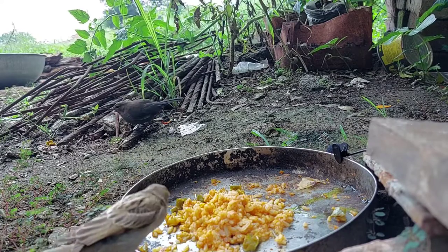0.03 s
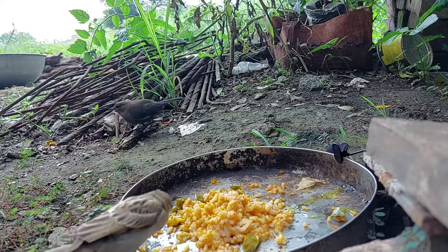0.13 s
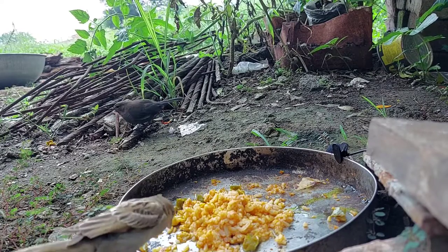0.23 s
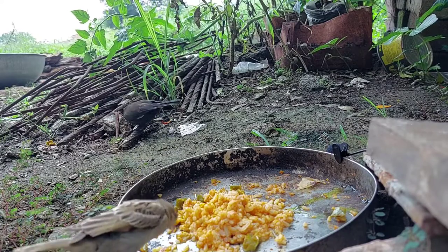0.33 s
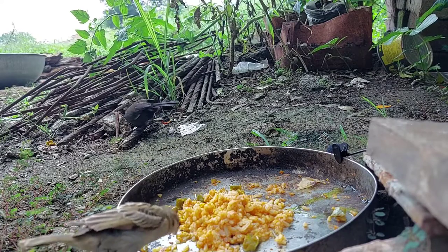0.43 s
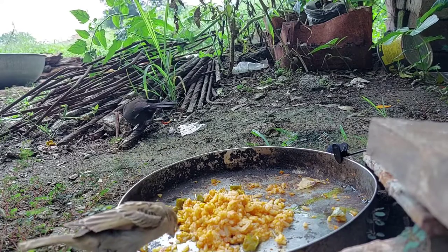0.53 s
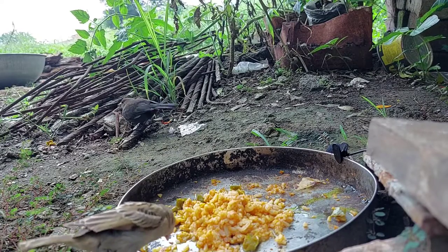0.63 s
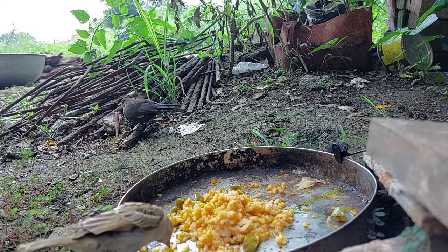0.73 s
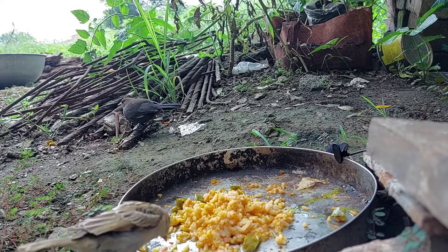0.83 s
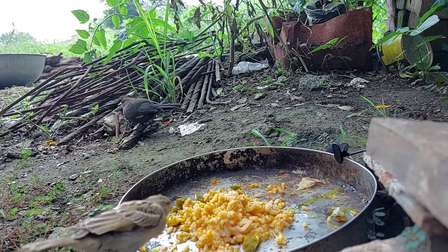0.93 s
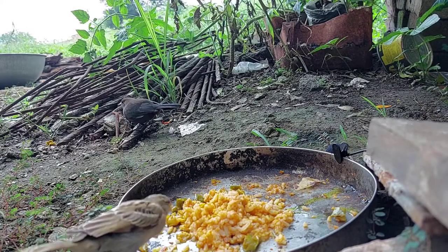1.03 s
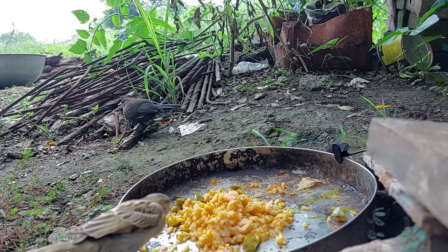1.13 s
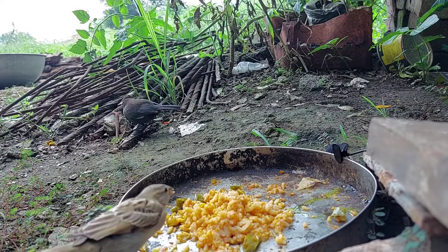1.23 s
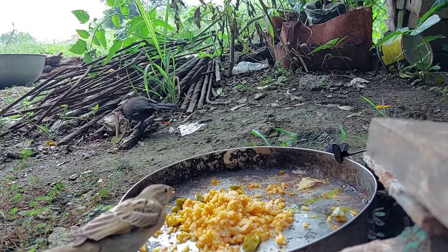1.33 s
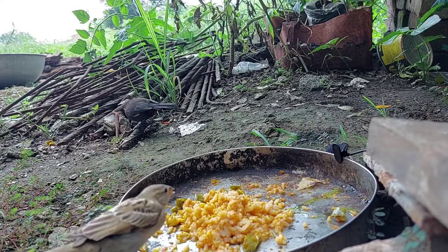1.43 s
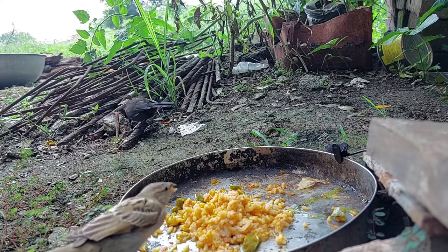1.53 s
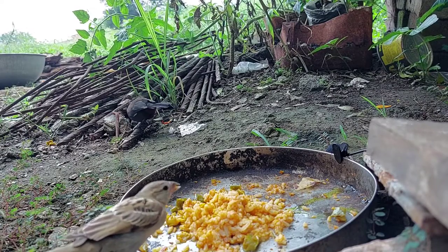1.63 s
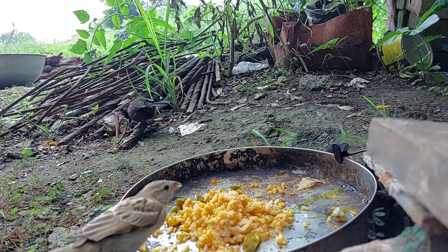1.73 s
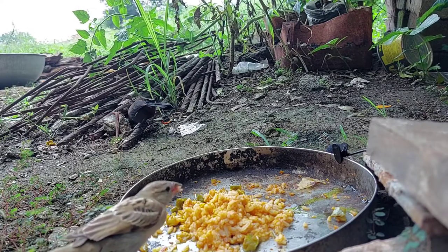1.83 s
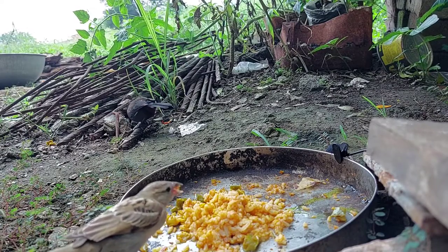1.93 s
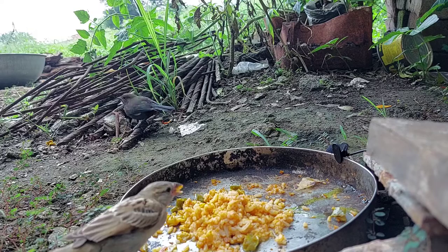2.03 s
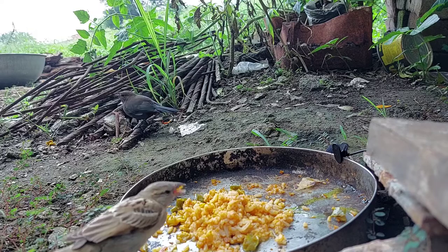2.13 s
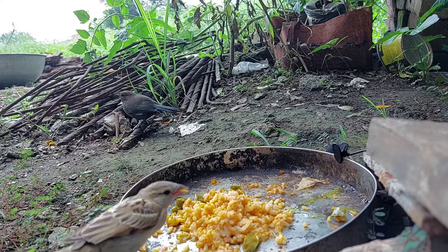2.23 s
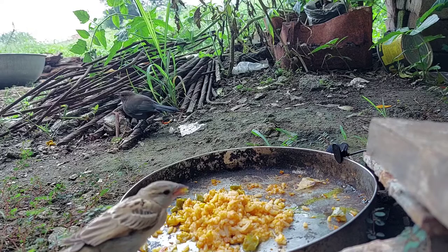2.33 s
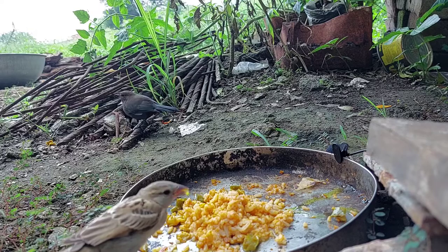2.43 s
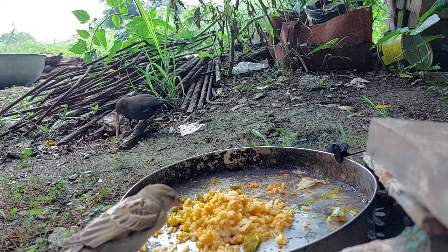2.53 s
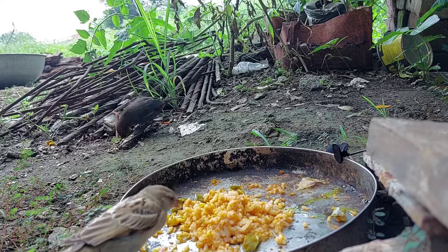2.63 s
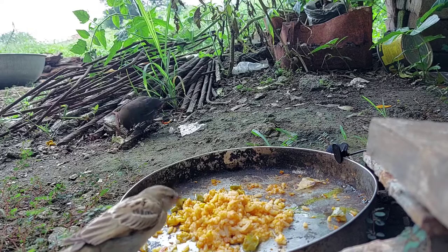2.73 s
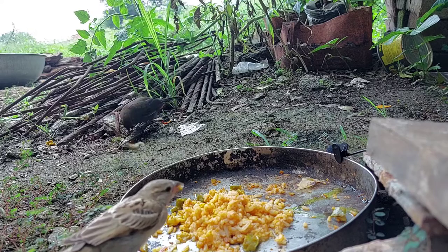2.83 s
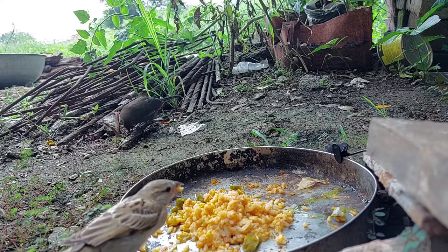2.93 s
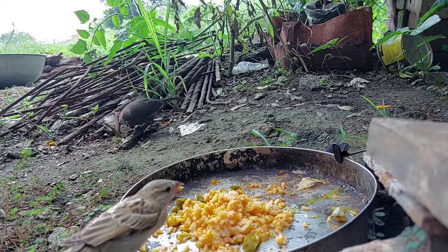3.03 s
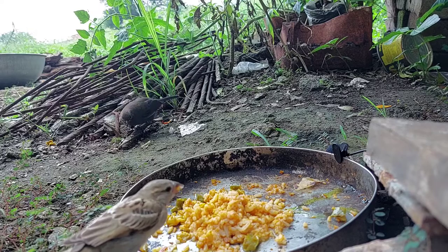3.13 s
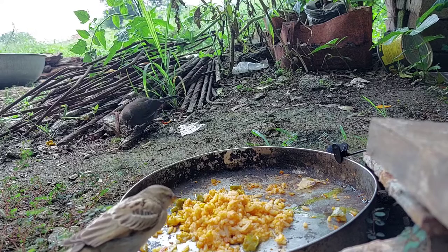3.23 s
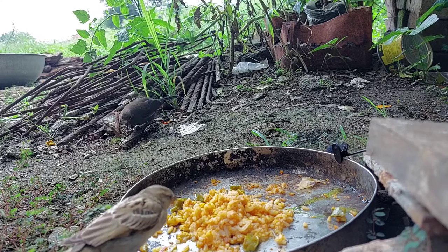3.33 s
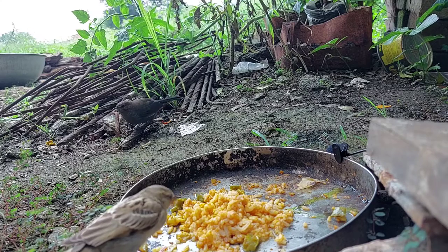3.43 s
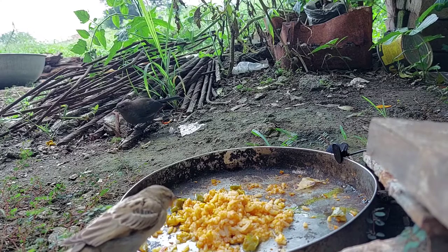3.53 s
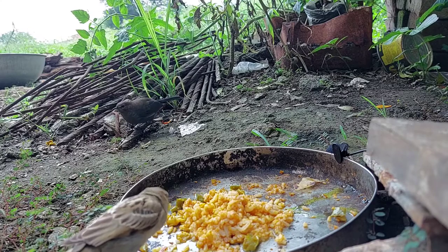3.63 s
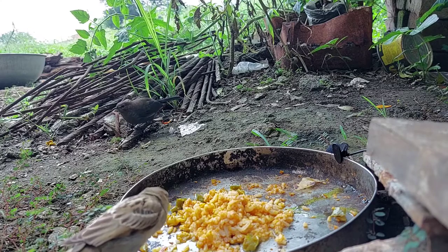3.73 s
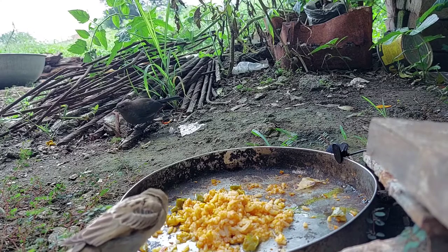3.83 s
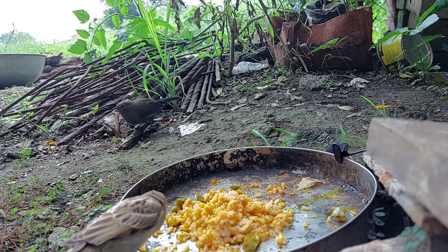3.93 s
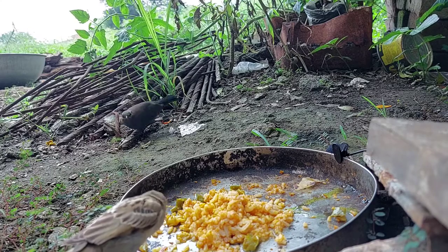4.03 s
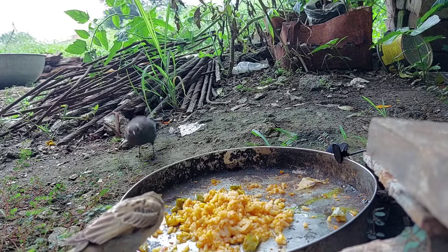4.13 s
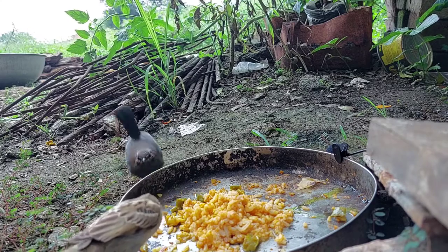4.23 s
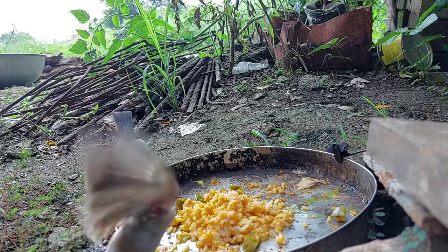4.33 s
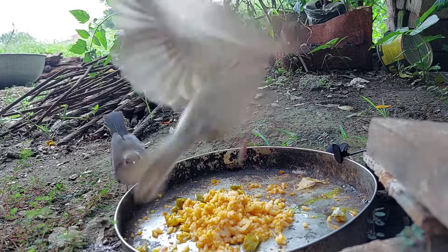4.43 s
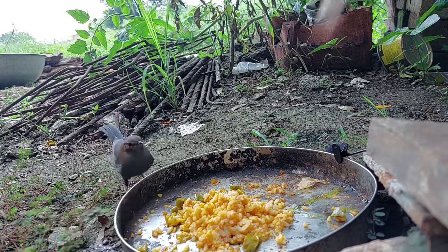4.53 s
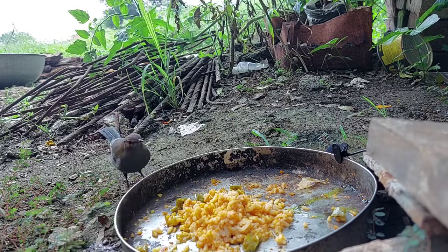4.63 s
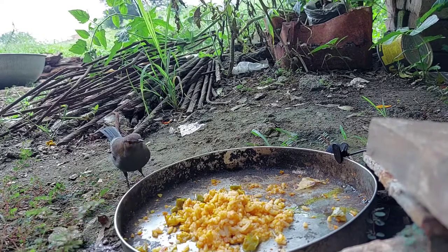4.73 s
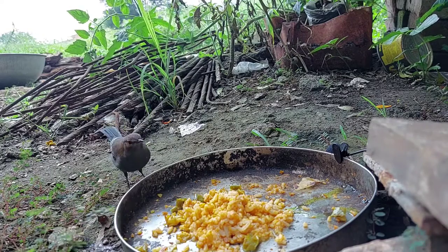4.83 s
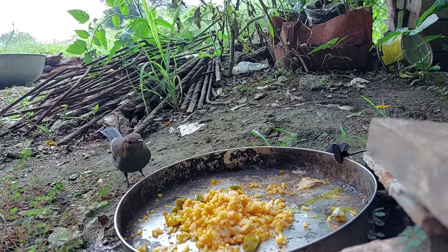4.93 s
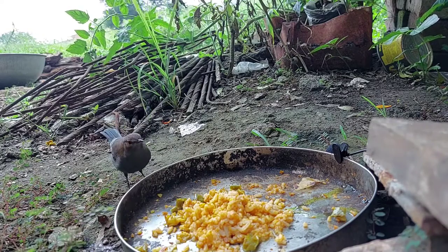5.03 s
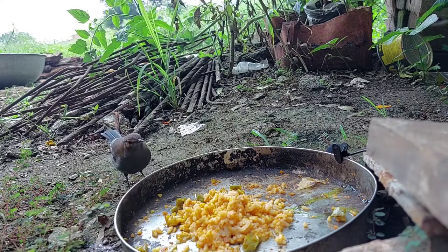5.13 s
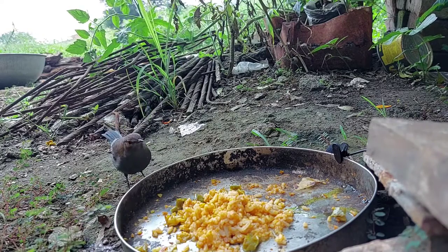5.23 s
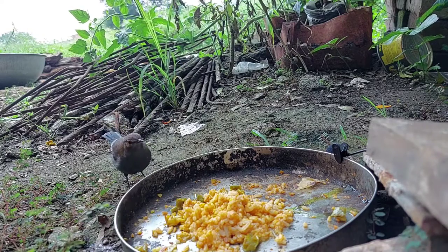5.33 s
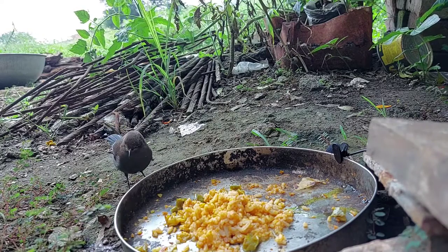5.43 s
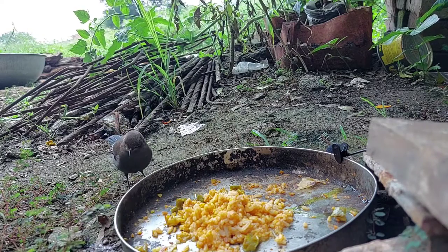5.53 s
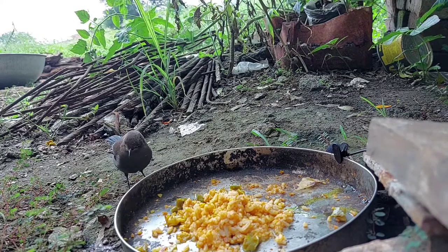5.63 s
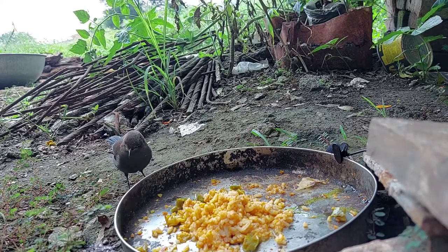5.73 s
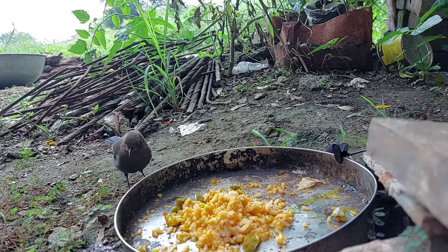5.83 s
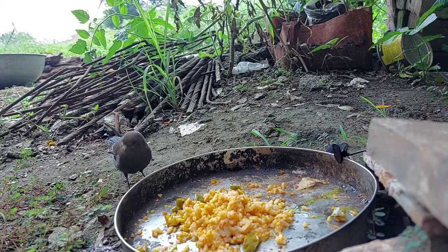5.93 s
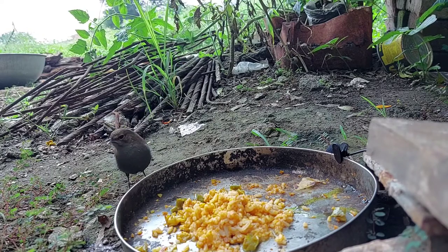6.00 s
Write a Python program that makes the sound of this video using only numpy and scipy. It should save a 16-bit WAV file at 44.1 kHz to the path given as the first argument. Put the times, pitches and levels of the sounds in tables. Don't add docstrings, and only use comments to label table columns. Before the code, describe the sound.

A quiet garden heard from a small microphone on the ground: soft wide breeze, low distant rumble and light hiss, slightly stronger at first. Faint ticks of beak and claws touch a thin metal pan near 0.1, 0.55 and 0.75 s. A high slurred chip sounds far off at 1.05 s, then a very faint low coo from 1.15 to 1.5 s, with a clearer cluster of pan taps at 1.4 s. Distant cheeps and a falling whistle pass around 2-2.3 s. Feathers shake drily at 2.5-2.9 s. Calm follows, with a small rustle at 4.15 s. At 4.36-4.51 s claws skid and kick the pan, its loudest knock at 4.44 s, merging with rapid feathery wingbeats, low thumps and swirling air. The flutter turns thinner and fades by 5.1 s. Breeze, sparse cheeps and barely audible ticks continue to 6 s.

```python
import sys
import numpy as np
from scipy import signal
from scipy.fft import rfft, irfft, next_fast_len
from scipy.io import wavfile
from scipy.ndimage import uniform_filter1d

SR = 44100
rng = np.random.default_rng(int(sys.argv[2]) if len(sys.argv) > 2 else 0)


def undo_db(level):
    steps = np.asarray(level, float) / 20
    return 10 ** steps


def generate_wav(signal):
    frames = np.transpose(np.atleast_2d(signal))
    scaled = np.clip(frames, -1, 1) * 32767
    pcm = np.round(scaled).astype(np.int16)
    wavfile.write(sys.argv[1], SR, pcm)


N = 267510
T = np.arange(N) / SR
FAST = next_fast_len(N)

# start in seconds, feather hiss in dB, air thump in dB.
WINGBEATS = [(4.3994, -52, -52.5), (4.4427, -34, -34.5), (4.4772, -34, -41), (4.504, -50, -27),
             (4.5229, -48, -45), (4.5445, -43.5, -30.5), (4.5667, -48, -36), (4.594, -42, -33.5),
             (4.6401, -43.5, -39.5), (4.6964, -46.5, -41.5), (4.7536, -50, -48.5), (4.842, -49, -49.5),
             (4.8976, -48, -49), (4.959, -50, -53), (5.008, -49.5, -47), (5.0556, -50, -45.5),
             (5.0729, -49.5, -56), (5.109, -63, -53.5)]
# frequency in Hz, level in dB, 60 dB decay time in seconds.
PAN_FLOOR = [(487, -23.5, 0.027), (683.6, -27, 0.081), (810, -20.5, 0.0199), (928, -20.5, .11),
             (1163, -6.5, 0.021), (1273, -1, 0.024), (1381, 9, 0.0064), (1499, 6, 0.014), (1614, -2, 0.016),
             (1939, -8, 0.05), (2250, -19, 0.086), (2645, -18, 0.054)]


def colour(x, points):
    hz, db = np.transpose(points)
    log_hz = np.log(np.fft.rfftfreq(FAST, 1 / SR) + 1)
    gain = undo_db(np.interp(log_hz, np.log(hz), db, left=-120, right=-120))
    return irfft(rfft(x, FAST) * gain / np.sqrt(np.mean(gain ** 2)), FAST)[:N]


def walk(rate, size=N):
    hold = int(SR / rate)
    steps = np.repeat(rng.standard_normal(size // hold + 1), hold)
    return 1.4 * uniform_filter1d(uniform_filter1d(steps, hold), hold)[:size]


def bursts(times, level_db, length_ms, rise):
    out, size = np.zeros(N), SR // 10
    grit = rng.standard_normal((len(times), size))
    for s, db, ms, noise in zip(times, level_db, length_ms, grit):
        u = np.arange(size) / SR / (max(ms, .3) / 1000)
        envelope = (1 - np.exp(-u / rise)) * np.exp(-u)
        i = int(s * SR)
        out[i:i + size] += (undo_db(db) * noise * envelope)[:N - i]
    return out


def ring(x, modes):
    response, power = 0, 0
    for k, (hz, db, t60) in enumerate(modes):
        pole = np.exp(2j * np.pi * hz / SR - np.log(1000) / (t60 * SR))
        response = response + (-1) ** k * undo_db(db) * (pole ** np.arange(SR // 5)).imag
        power += undo_db(db) ** 2 / (1 - abs(pole) ** 2) / 2
    return signal.oaconvolve(x, response)[:N] / np.sqrt(power)


def voice(hz, level, waver, flicker_db):
    pitch = hz * (1 + waver * walk(200, size=len(hz)))
    strength = np.sqrt(2) * level * undo_db(flicker_db * walk(70, size=len(hz)))
    return strength * np.sin(2 * np.pi * np.cumsum(pitch) / SR)


def calls(notes, waver, wet, tail_s, flicker_db, settle=3):
    out, after = np.zeros(N), T[:SR // 4]
    for s, length, first_hz, last_hz, db in notes:
        u, i = np.clip(after / length, 0, 1), int(s * SR)
        glide = last_hz + (first_hz - last_hz) * (1 - u) ** settle
        out[i:i + len(u)] += voice(glide, undo_db(db) * np.sin(np.pi * u), waver, flicker_db)[:N - i]
    tail = wet * rng.standard_normal(len(after)) * np.exp(-after / tail_s)
    return .6 * out + signal.fftconvolve(out, tail)[:N]


def garden():
    # frequency in Hz, level in dB per Hz.
    spectrum = [(12, -40.5), (20, -11), (38, -8), (70, 1), (88, -0.5), (186, -16.5), (245, -16),
                (343, -20.5), (598, -21), (835, -25), (1130, -25), (2150, -27), (5250, -32.5),
                (8430, -24.5), (15600, -52.5)]
    # frequency in Hz, side minus mid in dB.
    width = [(60, -22.5), (110, -24.5), (200, -17), (380, -15), (700, -19.5), (1290, -23.5), (2380, -18.5),
             (4400, -10.5), (8120, -19.5), (15000, 3)]
    # time in seconds, strength in dB.
    breeze = [(0, 7), (.2, 7.5), (.6, 4.5), (1.2, 5.5), (2.2, 3), (3, 3), (3.6, 2.5), (4.2, 2), (4.6, 7),
              (5.2, 1.5), (6.1, 0.5)]
    leaves_db = np.interp(T, *np.transpose(breeze))
    mid_db, rumble_db = 0.68 * leaves_db + 0.21, -0.73
    mid = colour(rng.standard_normal(N), spectrum)
    hz, db = np.transpose(width)
    corner_hz = np.transpose(spectrum)[0]
    side_db = np.interp(np.log(corner_hz), np.log(hz), db)
    other = rfft(colour(rng.standard_normal(N), spectrum), FAST)
    octave = np.log2(np.fft.rfftfreq(FAST, 1 / SR) + 1)
    side = irfft(other * undo_db(np.interp(octave, np.log2(corner_hz), side_db)), FAST)[:N]
    pair, out = rfft(np.array([mid + side, mid - side]), FAST), 0
    for centre in np.arange(4, 14.6, .5):
        band = np.cos(np.pi * np.clip(octave - centre, -.5, .5)) ** 2
        swell_db = rumble_db if centre < 7.5 else mid_db if centre < 12.4 else leaves_db
        flicker_db = 1.3 * walk(3.05) + 0.49 * walk(26)
        out = out + undo_db(swell_db + flicker_db) * irfft(pair * band, FAST)[:, :N]
    return undo_db(-65) * out


def dove():
    # time in seconds, pitch in Hz, level in dB.
    coo = [
        (1.13, 147, -72),
        (1.188, 144, -65),
        (1.196, 142, -66),
        (1.238, 179.7, -63.5),
        (1.312, 189.5, -73),
        (1.446, 187, -68.5),
        (1.5, 190, -76),
    ]
    s, hz, db = np.transpose(coo)
    level = uniform_filter1d(undo_db(np.interp(T, s, db, -140, -140)), SR // 50)
    return voice(np.interp(T, s, hz), level, waver=0.02, flicker_db=2.5)


def far_birds():
    # start and length in seconds, first and last pitch in Hz, level in dB.
    whistles = [
        (2.25, 0.09, 7880, 5460, -62),
        (2.30, 0.069, 5600, 5470, -65.5),
    ]
    # start and length in seconds, first and last pitch in Hz, level in dB.
    chips = [
        (1.055, 0.075, 7970, 6080, -59.5),
        (1.07, 0.062, 7740, 6600, -68),
    ]
    # start in seconds, settled pitch in Hz, level in dB.
    small_birds = [(.025, 4000, -68), (.87, 4050, -66), (1.235, 3620, -68.5), (1.93, 4070, -68),
                   (1.989, 3320, -70), (2.14, 3560, -67), (3.19, 3750, -69), (3.235, 3300, -71),
                   (3.89, 3800, -70), (3.96, 3050, -72), (4.234, 3700, -68), (4.99, 4430, -70),
                   (5.04, 3650, -67), (5.121, 4040, -69), (5.18, 3204, -69.5), (5.56, 3700, -78),
                   (5.729, 4090, -70), (5.751, 3510, -71), (5.92, 4100, -66.5), (5.98, 3270, -69.5)]
    cheeps = [(s, .085, hz + 300, hz, db) for s, hz, db in small_birds]
    out = calls(whistles, waver=.008, wet=.014, tail_s=.045, flicker_db=2)
    out = out + undo_db(-9.) * calls(cheeps, waver=.06, wet=.035, tail_s=.035, flicker_db=2, settle=1.5)
    return out + undo_db(-1.5) * calls(chips, waver=.06, wet=.03, tail_s=0.021, flicker_db=3.0, settle=1.4)


def whoosh():
    # time in seconds, level in dB.
    swirl = [
        (4.35, -81),
        (4.446, -40),
        (4.46, -50),
        (4.5, -34),
        (4.545, -54.5),
        (4.74, -69),
        (4.844, -97),
        (4.88, -76.5),
        (5.1, -64),
    ]
    db = np.interp(T, *np.transpose(swirl), -120, -120)
    upper_db = np.where(db > -119, 0.77 * db - 20.5, -120)
    hop = undo_db(-59) * np.exp(-np.abs(T - 4.14) * 1000 / 9.7)
    bands = ((undo_db(db - 2.0) + undo_db(-14.0) * hop, [(90, -15.0), (140, 7), (380, -2), (480, -8)]),
             (undo_db(upper_db) + undo_db(-3.5) * hop, [(330, -12), (430, -2.5), (850, -1.5), (1100, -21.0)]))
    return sum(gain * undo_db(1.1 * walk(60)) * colour(rng.standard_normal(N), band) for gain, band in bands)


def thumps():
    out = np.zeros(N)
    for s, _, db in WINGBEATS:
        u, i = T[:SR // 4], int(s * SR)
        phase = 2 * np.pi * 49 * u
        swing = np.sin(phase) - 0.26 * np.cos(2 * phase)
        out[i:i + len(u)] += undo_db(db + 7.5) * (1 - np.exp(-u / 0.0026)) * np.exp(-u / 0.018) * swing
    return out


def feathers(strokes, rise, back_s=0., back_db=-90.):
    # frequency in Hz, level in dB per Hz.
    bright = [(2350, -41.5), (4000, -11), (5080, -12.5), (6450, -1.5), (8860, 1.5), (9990, -3),
              (12200, -18), (14700, -32), (15600, -43)]
    # frequency in Hz, level in dB per Hz.
    dull = [(250, -38.5), (600, -12.5), (1000, -3.5), (1700, 1), (3000, 0), (4500, -11), (6000, -37.5)]
    s, hiss_db, body_db, ms = np.transpose(strokes)
    hiss = bursts(s, hiss_db - 1.0, ms, rise)
    hiss = hiss + bursts(s + back_s, hiss_db + back_db, ms, rise)
    return colour(hiss, bright) + colour(bursts(s, body_db + 0.5, ms, rise), dull)


def rustling():
    # start in seconds, level in dB.
    rubs = [(1.032, -57), (1.446, -58), (1.9174, -54), (1.9538, -53), (2.4943, -48), (2.5022, -50),
            (2.6344, -40.5), (2.6584, -52), (2.753, -39.5), (2.763, -48), (2.7715, -50), (2.788, -45),
            (2.797, -38), (2.808, -32), (2.816, -45), (2.8228, -34), (2.837, -34), (2.8455, -36),
            (2.8594, -42), (2.876, -53), (4.1581, -52), (4.1719, -39), (4.182, -47), (4.1913, -41.5),
            (4.2762, -57)]
    # start in seconds, hiss in dB, body in dB, length in ms.
    shakes = [
        (2.495, -53, -85, 10),
        (2.77, -46.5, -58, 19),
        (2.82, -57, -57.5, 43),
        (4.175, -55, -62.5, 21),
    ]
    rustles = [(s, db, db - 18.5, 3.1) for s, db in rubs]
    return feathers(rustles, rise=0.74) + feathers(shakes, rise=0.68)


def wing_strokes():
    airborne_s, landing_s = 4.49, 5.03
    s, db = np.transpose([beat[:2] for beat in WINGBEATS if beat[0] > airborne_s])
    climb_db = 22 * np.exp((s[0] - s) / 0.023)
    landing_db = 12 * (s > landing_s)
    ms = 10.6 - 6.6 * (s - s[0])
    return feathers(np.transpose([s, db, db - 11.5 + climb_db + landing_db, ms]),
                    rise=.9, back_s=.027, back_db=-10.)


def rocking():
    grip = bursts([4.387], [-27], [3.5], rise=.3)
    push_off = bursts([4.504], [-26.5], [4.6], rise=.3)
    return ring(grip, [PAN_FLOOR[9]]) + ring(push_off, [PAN_FLOOR[1], PAN_FLOOR[3]])


def contacts():
    # start in seconds, knock in dB,
    # scrape in dB, thinness in dB.
    taps = [(0.079, -54, -51.5, 3), (0.084, -58, -56, 6), (0.123, -61, -65, 5), (0.5, -59, -74, 6),
            (0.56, -48.5, -47.5, -8.5), (0.721, -74, -56.5, -8), (0.748, -71, -56.5, 8),
            (1.379, -50.5, -70, -8), (1.386, -46, -57, 3), (1.389, -41, -49.5, -5), (1.393, -36, -48.5, 3),
            (1.397, -43, -54, -6), (1.402, -55, -64, -5), (1.502, -66, -56.5, -7), (2.029, -60.5, -75, 0),
            (2.172, -57, -76, 2), (2.256, -69, -55.5, 5), (2.333, -49.5, -69, -6), (3.309, -61, -71, 2),
            (4.312, -58, -62, -2), (4.334, -67.5, -65, -6), (4.765, -61, -63, -3), (4.856, -61.5, -73, 3),
            (4.916, -61, -77, 5), (4.973, -57.5, -72.5, 5), (5.565, -66, -78, 0), (5.831, -70, -53.5, 0.5),
            (5.84, -80, -65, 0)]
    # start in seconds, knock in dB, scrape in dB, thinness in dB.
    kicks = [(4.358, -48, -46, -3), (4.364, -50, -46.5, 0), (4.373, -49, -42, -8), (4.377, -37, -34.5, -2),
             (4.386, -39.5, -41, -9), (4.391, -36.5, -41, -8), (4.397, -36, -46, -4),
             (4.414, -34, -49.5, -4), (4.423, -28, -25, -2), (4.428, -36, -34, -3.5), (4.438, -36, -32, -3),
             (4.441, -13.5, -29, 0), (4.4444, -21.5, -40.5, 0.5), (4.466, -27, -46, -3),
             (4.473, -27, -39, 0), (4.477, -29, -36.5, -4), (4.479, -26, -35, -4.5), (4.484, -36, -37, -8),
             (4.488, -43, -31.5, 9.5), (4.494, -28, -32.5, 4.5), (4.498, -29.5, -40.5, 0),
             (4.502, -36, -48, 11.5), (4.513, -43, -54, 0)]
    # time in seconds, pressure in dB.
    pressure = [
        (4.36, -51.5),
        (4.375, -50),
        (4.41, -40.5),
        (4.435, -46),
        (4.455, -43),
        (4.485, -41),
        (4.506, -46.5),
    ]
    s = np.arange(pressure[0][0], pressure[-1][0], .005)
    chance = rng.standard_normal((len(s), 4)).T * 3
    db = np.interp(s, *np.transpose(pressure))
    skid = [s + .0005 * chance[0], db + chance[1], db - 7.5 + chance[2], chance[3] - 4]
    s, knock, scrape, thin = np.hstack([np.transpose(taps + kicks), skid])
    rim = 0.27 * knock + (1 - 0.27) * scrape - 4
    scratch, squeak = scrape - 1 - thin / 2, scrape - 1.5 + thin / 2
    return np.transpose([s, knock, rim, scratch, squeak, np.full(len(s), 1.71)])


def pan(hits):
    # frequency in Hz, level in dB, 60 dB decay time in seconds.
    rim = [(3010, -8.5, 0.044), (3410, -9, 0.065), (3785, -11, 0.021), (4000, 3.5, 0.0018), (4180, 1, .012),
           (4690, -5.5, 0.017), (5200, -0.5, 0.004)]
    # frequency in Hz, level in dB, 60 dB decay time in seconds.
    scratch = [(5840, -0.5, 0.01), (6500, 3, 0.0026), (6520, 6.5, 0.009), (7080, 3.5, 0.011)]
    # frequency in Hz, level in dB, 60 dB decay time in seconds.
    squeak = [(7810, -6, .012), (8700, -6, 0.0062), (9100, -1.5, 0.0056), (9700, 5, .0015),
              (9750, 3, 0.0026)]
    s, *levels, ms = np.transpose(hits)
    boosts_db = (4.2, 9.7, 8.65, 11.8)
    drives = [bursts(s, db + boost_db, ms, rise=0.31) for db, boost_db in zip(levels, boosts_db)]
    np.add.at(drives[0], (s * SR).astype(int), undo_db(levels[0] + 25.0))
    out = 0
    for drive, modes in zip(drives, (PAN_FLOOR, rim, scratch, squeak)):
        edges = [0.56 * modes[0][0], 1.5 * modes[-1][0]]
        radiation = signal.butter(2, edges, "band", fs=SR, output="sos")
        out = out + signal.sosfilt(radiation, ring(drive, modes))
    crack = bursts(s, 1.38 * np.maximum(levels[2], levels[3]) - 2.0, ms, rise=0.27)
    return out + colour(crack, [(9000, -17.5), (11000, -1), (13500, -10.5), (15700, -21.5)])


def reflections(near):
    u = T[:SR // 3]
    tail = np.pad(rng.standard_normal(len(u)) * np.exp(-u / 0.051), (0, N - len(u)))
    echoes = colour(tail, [(200, -1), (800, 2.0), (2000, -9.5), (4000, -10), (12000, -4.0)])
    return undo_db(-51.5) * irfft(rfft(near, FAST) * rfft(echoes, FAST), FAST)[:N]


def scene():
    opposed = np.array([[1], [-1]])
    far = dove() + far_birds()
    near = pan(contacts()) + rocking() + rustling() + wing_strokes()
    near = near + reflections(near)
    eddies = whoosh() * undo_db(.7 * opposed) + undo_db(-26.5) * whoosh() * opposed
    mismatch = signal.fftconvolve(near, rng.standard_normal(64) / 8)[:N] * undo_db(-33) * opposed
    return near + mismatch + thumps() + eddies + far + garden()


def roll_off(x):
    return signal.sosfilt(signal.butter(12, 15710, fs=SR, output="sos"), x)


def record(dry):
    bass_cut = signal.butter(2, 36., "high", fs=SR, output="sos")
    mix = signal.sosfilt(bass_cut, dry)
    return roll_off(mix)


dry = scene()
out = record(dry)
generate_wav(out)
```